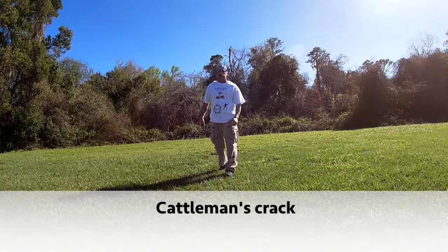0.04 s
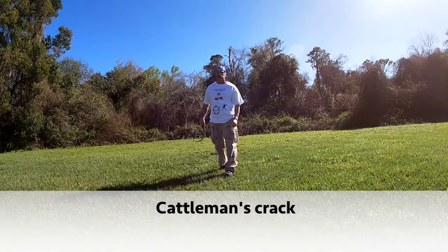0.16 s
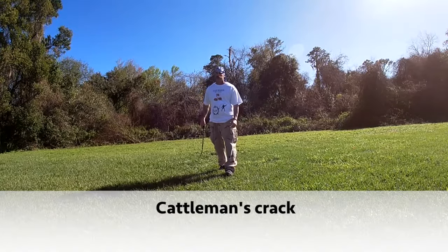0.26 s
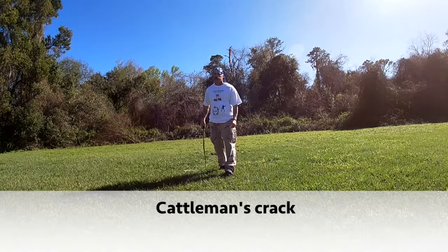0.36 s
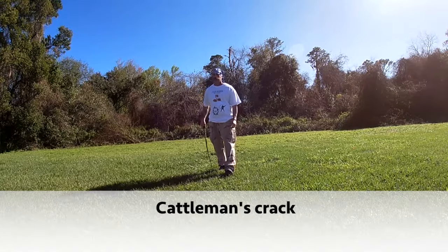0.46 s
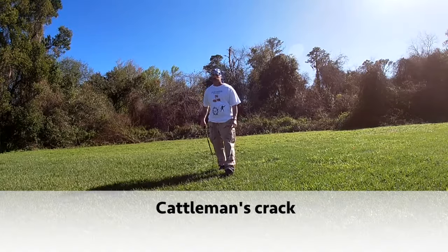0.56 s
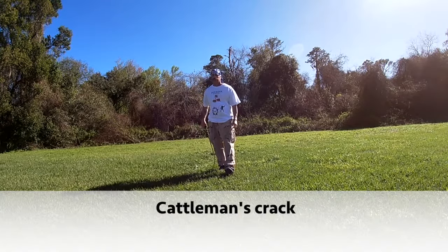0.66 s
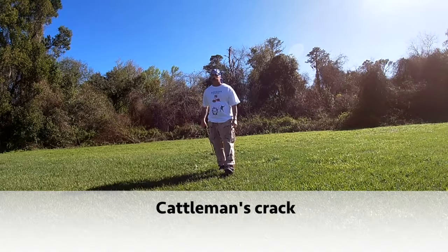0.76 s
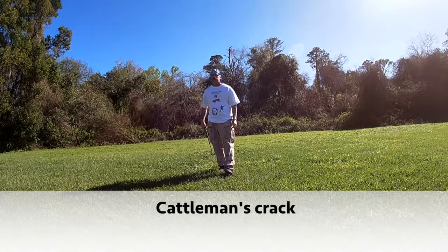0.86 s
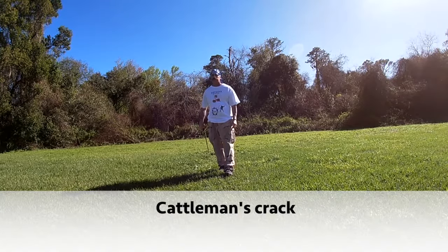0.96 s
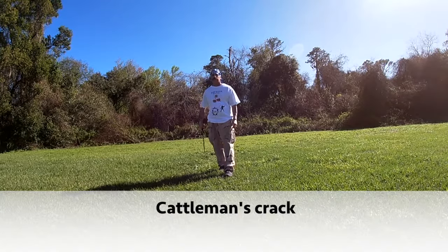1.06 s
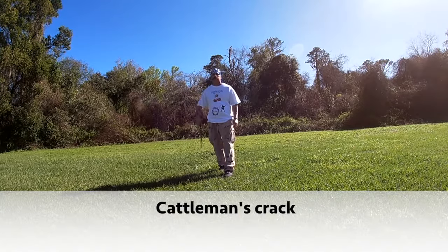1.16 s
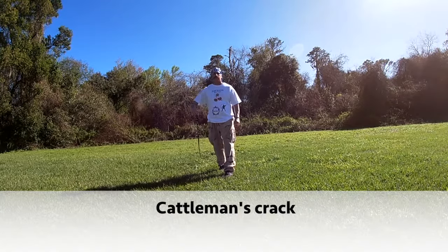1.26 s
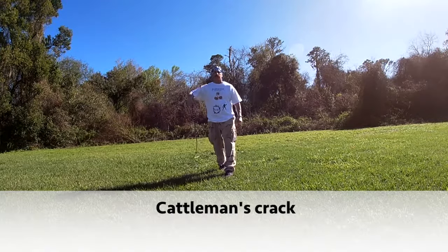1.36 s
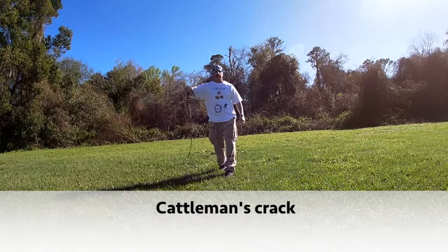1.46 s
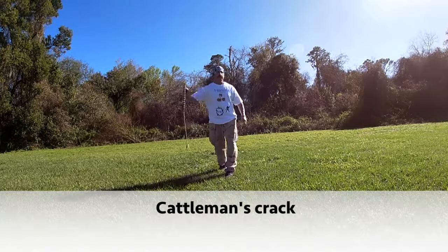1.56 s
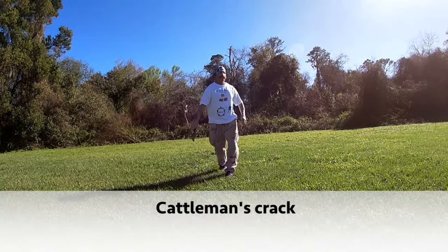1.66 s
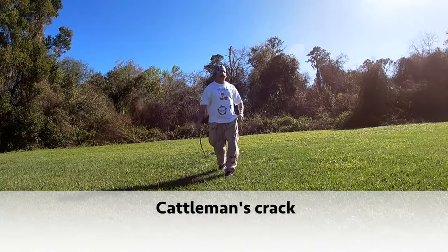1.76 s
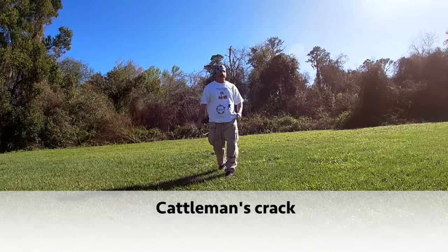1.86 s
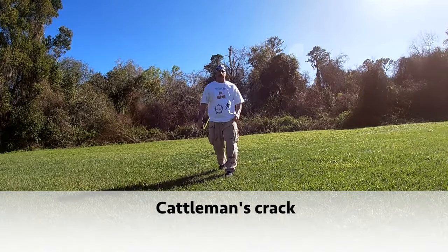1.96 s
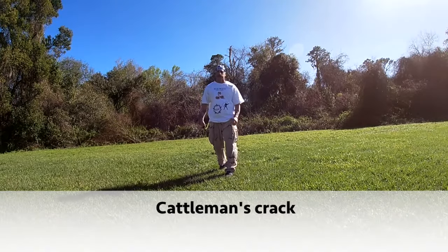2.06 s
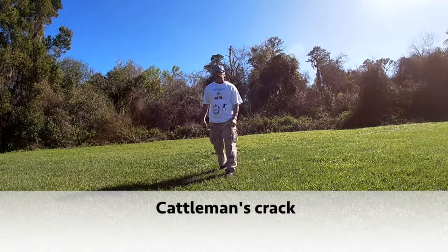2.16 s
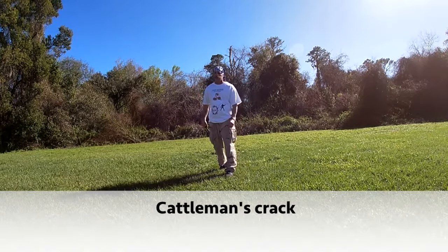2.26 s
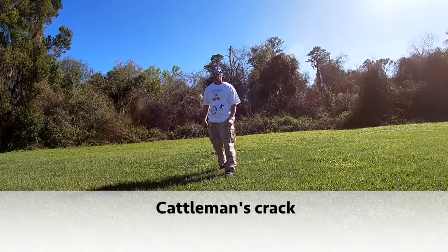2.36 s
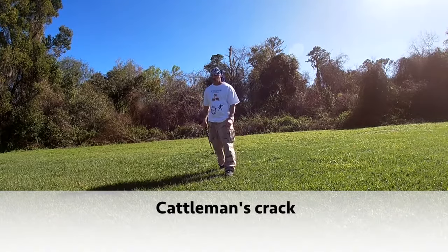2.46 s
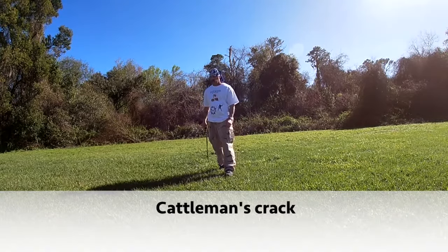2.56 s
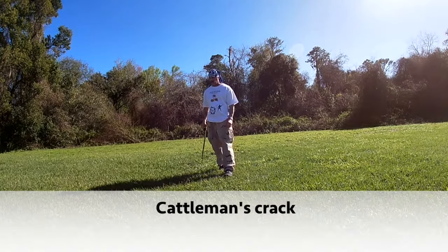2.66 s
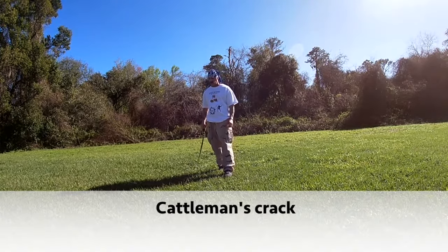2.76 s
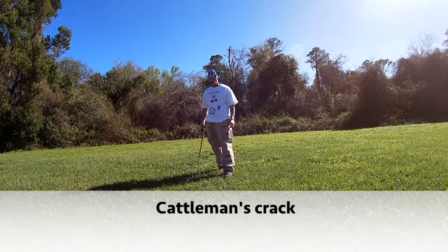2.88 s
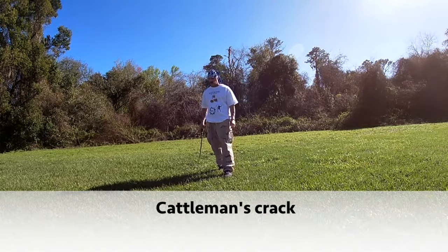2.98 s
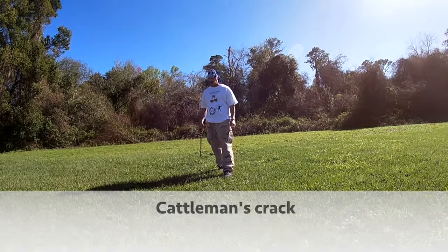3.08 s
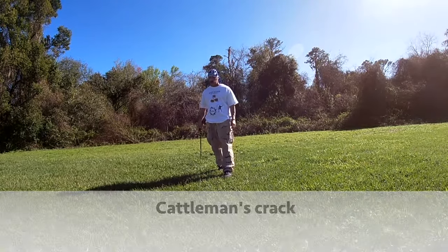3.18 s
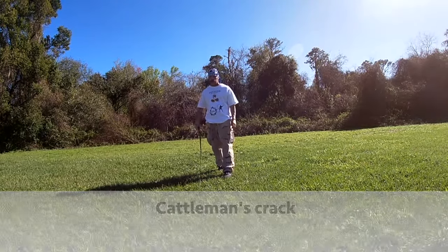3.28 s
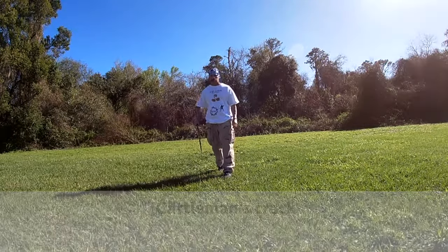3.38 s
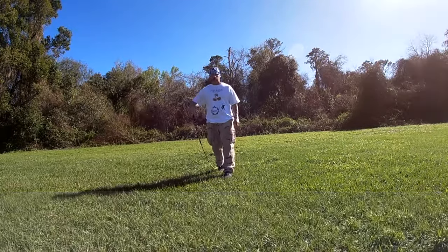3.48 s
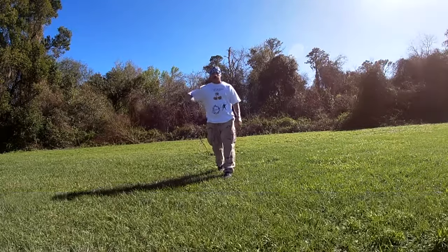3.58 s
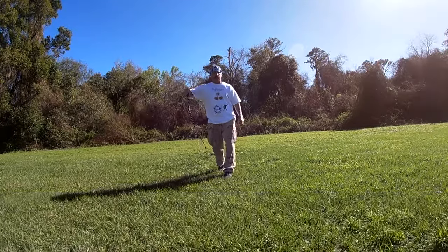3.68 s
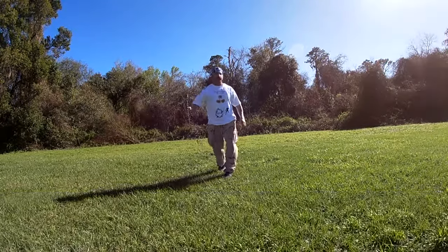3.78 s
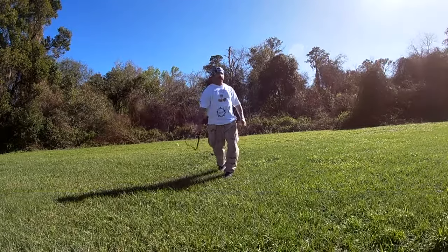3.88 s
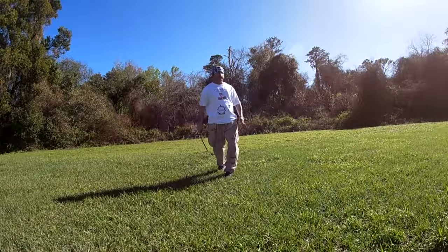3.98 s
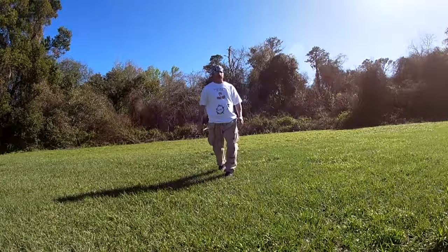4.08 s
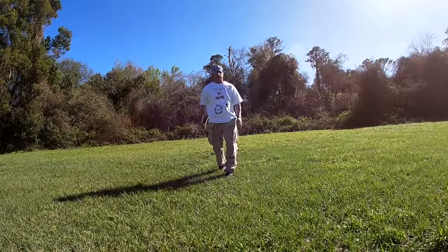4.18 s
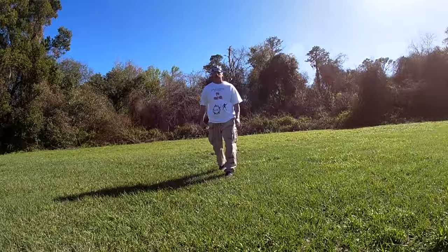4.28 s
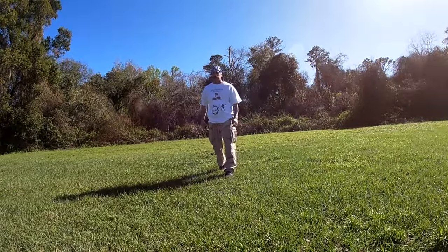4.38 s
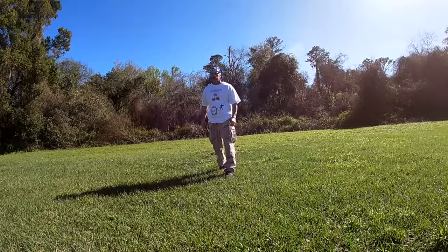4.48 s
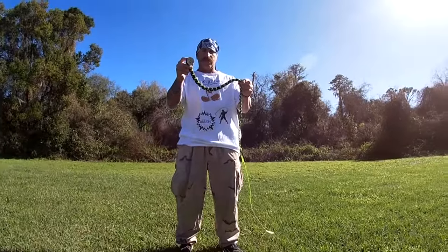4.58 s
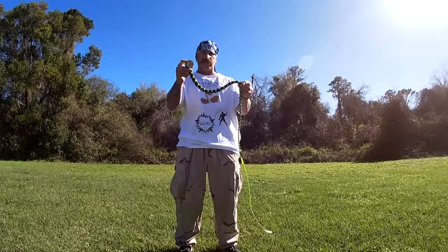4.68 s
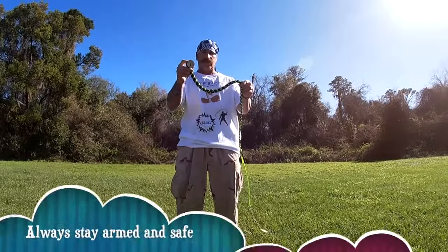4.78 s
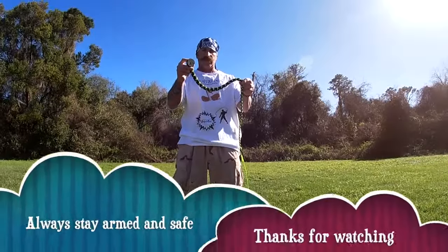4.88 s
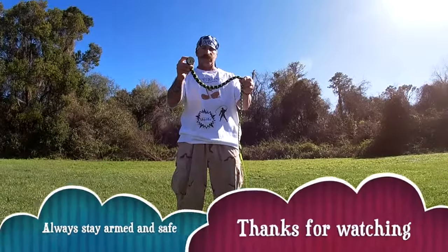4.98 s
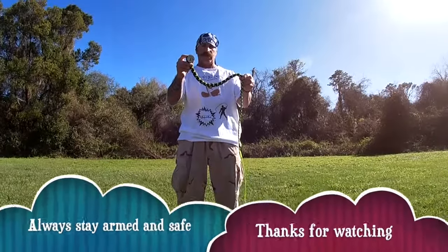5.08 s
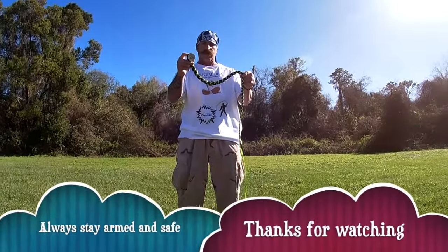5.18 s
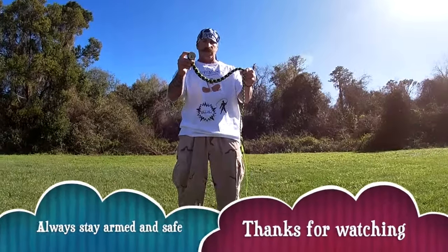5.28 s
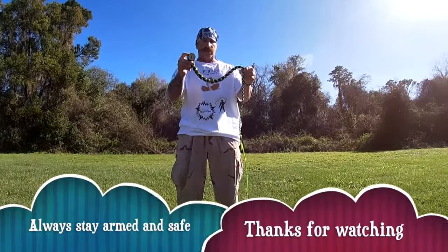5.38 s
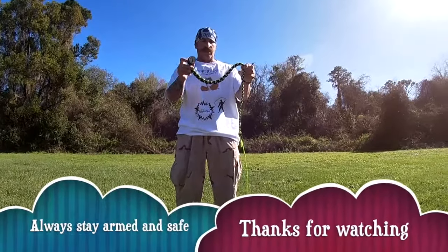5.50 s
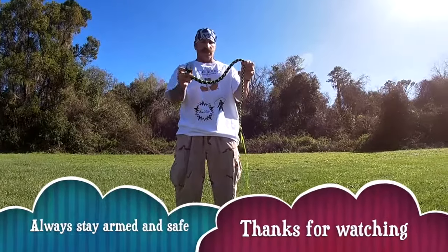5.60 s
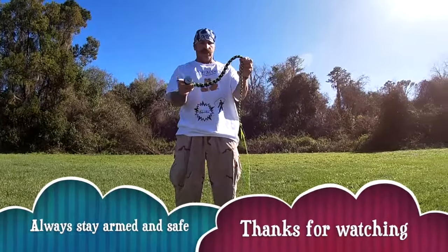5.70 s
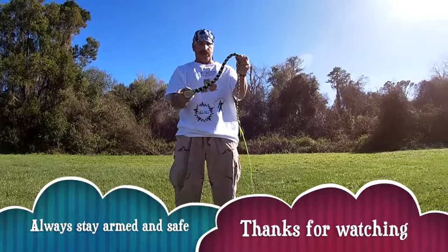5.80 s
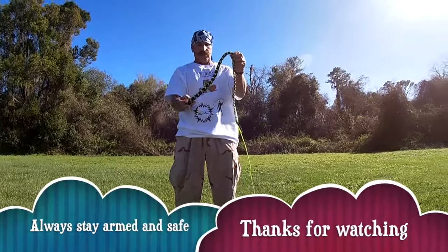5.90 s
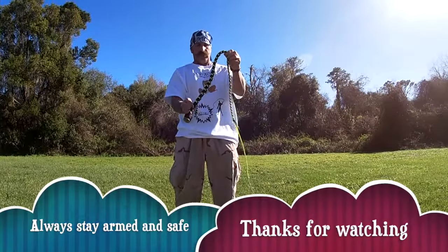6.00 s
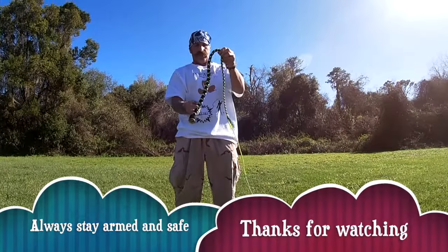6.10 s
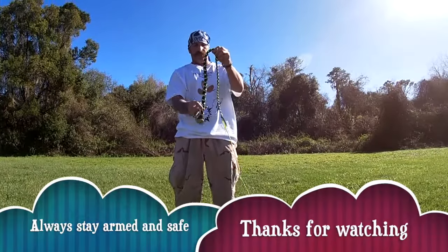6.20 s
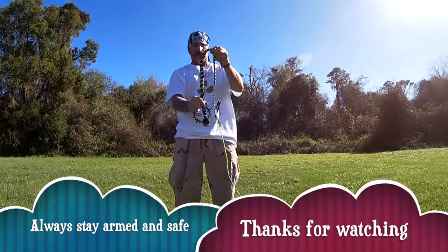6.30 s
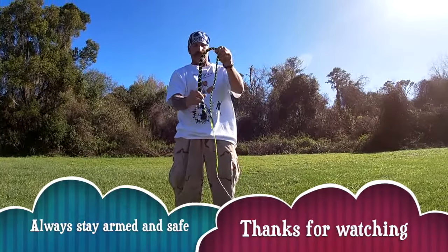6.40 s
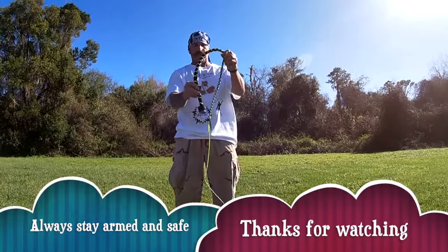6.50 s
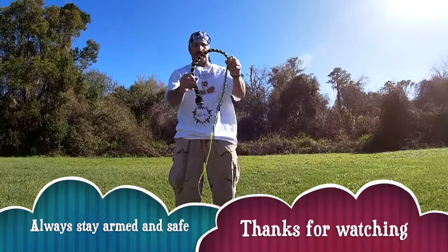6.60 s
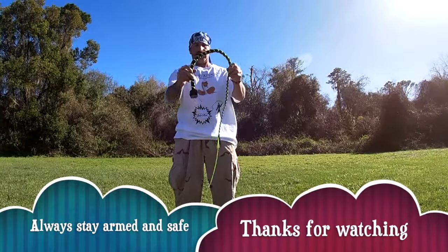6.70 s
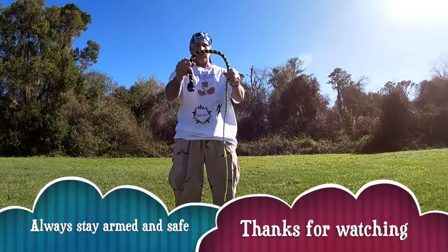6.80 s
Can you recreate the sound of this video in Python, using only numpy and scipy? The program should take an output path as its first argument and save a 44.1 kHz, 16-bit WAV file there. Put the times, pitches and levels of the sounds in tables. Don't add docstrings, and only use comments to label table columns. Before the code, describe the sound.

An open lawn recorded with an exposed outdoor microphone. From 0 to 0.75 s strong wind buffets it with deep, lumpy thumps, hardest around 0.5 and 0.7 s, with a few faint bird chirps. Beneath run a low, steady small-engine throb near idle, distant traffic hiss and thin high insect buzzing; the wind eases after 1 s. At 1.74 s a whip cracks: a tiny rush, then an extremely sharp, clipped, bright snap, with a scattered tree echo a tenth of a second later, fading within half a second. Faint grass brushes and ticks come at 2.5-3.5 s. A second similar crack hits at 3.93 s, with its echo. Lash ticks sound at 4.3-4.4 s. At 4.56 s a hard cut removes the engine: far quieter air remains, with soft low wind, faint leaf hiss, barely audible buzzing, and small wind bumps near 6.6 s until the end at about 6.9 s.

```python
import sys
import numpy as np
from scipy import signal
from scipy.fft import rfft, irfft, next_fast_len
from scipy.io import wavfile
from scipy.ndimage import uniform_filter1d, map_coordinates

SR = 44100
rng = np.random.default_rng(int(sys.argv[2]) if len(sys.argv) > 2 else 0)


def how_loud(loudness_db):
    steps = np.asarray(loudness_db, float) / 20
    return 10 ** steps


def wrap_up_sound(samples):
    columns = np.atleast_2d(samples).T
    tamed = np.clip(columns, -1, 1)
    steps = np.round(tamed * 32767).astype(np.int16)
    wavfile.write(sys.argv[1], SR, steps)


N = 302085
TIME = np.arange(N) / SR
CUT = 4.5572
BEFORE = TIME < CUT

# (time [s], level [dB])
TRAFFIC_LEVEL = [
    [(0, -37), (.3, -40), (1.6, -40.5), (2.45, -39.5), (4.55, -38.5)],
    [(4.6, -55), (5.5, -52.5), (6.85, -52.5)],
]
# (frequency [Hz], density [dB per Hz])
TRAFFIC_COLOUR = [
    [(190, -22.5), (330, 0.5), (377, -6.5), (526, -11), (820, -11), (1360, -12.5), (1920, -16.5),
     (2450, -21.5), (2900, -35.5), (4160, -59.5), (7040, -120)],
    [(180, -6), (300, 0.5), (416, -13.5), (640, -5.5), (880, -1.5), (1070, -3.5), (1840, -12.5),
     (2400, -22.5), (3100, -31.5), (4200, -58), (6160, -120)],
]
# (frequency [Hz], density [dB per Hz])
LEAF_COLOUR = [
    [(1650, -30.5), (2800, 0.5), (5690, -6.5), (7860, -19.5), (9770, -12.5), (10800, -20.5), (12600, -35.5),
     (13300, -55.5), (15000, -56.5)],
    [(1650, -49), (2800, -8.5), (3670, 3), (4800, -2), (5710, 0), (7830, -9), (9930, -9.5), (10800, -16),
     (13000, -26)],
]
# (time [s], level [dB])
WIND_LEVEL = [
    [(0, -13.5), (.19, -18), (.36, -14.5), (.53, -11), (.72, -18), (1.1, -25), (1.4, -24.5), (2.1, -27),
     (2.95, -26.5), (4.2, -32), (4.55, -27)],
    [(4.57, -41), (4.9, -37.5), (5.1, -44.5), (5.57, -39.5), (6.4, -38), (6.6, -37.5), (6.85, -39)],
]
# (frequency [Hz], density [dB per Hz])
WIND_COLOUR = [
    [(8, -29.5), (18, -7), (35, -4.5), (60, -3.5), (100, -8), (170, -8.5), (260, -24.5), (500, -50.5),
     (1100, -120)],
    [(8.8, -36), (15, -4.5), (90, -2), (119, -12), (162, -8), (247, -15.5), (270, -35), (500, -33),
     (650, -65), (1100, -120)],
]
# (time [s], peak [dB], pitch [Hz], direction and strength [factor])
WIND_SLAPS = [(0.306, -1.5, 80, 1), (0.4999, 2, 121, 1), (.377, 0, 60, 0.76), (0.497, -14, 300, -1.3),
              (.514, -3, 135, -1.16), (.519, -1.5, 121, 0.95), (.549, -8.5, 130, 0.76),
              (.709, -26, 475, -1), (5.575, -26, 35.2, 1), (6.574, -34, 450, -1), (.6, -4.5, 45, -1.37),
              (.613, -6, 50, 1), (0.7052, 3, 115, 0.76), (.711, -3, 99, -0.98), (2.966, -8.5, 50, 1),
              (3.932, -8.5, 55.3, 0.85), (4.606, -20, 70, 0.98), (4.706, -26, 109.5, 1),
              (6.573, -25.5, 208, -0.91), (6.582, -21, 109.6, -0.82), (6.615, -15.5, 60, -1),
              (6.69, -23, 69.5, -1.15), (6.708, -25.5, 54.5, -1.3)]
# (time [s], near insect [dB], far insect [dB])
INSECT_LEVEL = [
    [(0, -73, -72), (.4, -69, -83), (1.1, -69.5, -73), (1.6, -63, -72.5), (2.3, -67, -80.5), (3, -64, -76),
     (3.45, -66, -81), (3.85, -64.5, -68.5)],
    [(4.7, -84.5, -94), (5.13, -78, -81), (5.9, -85.5, -87), (6.85, -87, -89.5)],
]
# (rate [per s], start [share of cycle], length [share of cycle], top [Hz], rise [Hz], fall [Hz])
WING_STROKES = [
    (59.6, 0.5, .64, 9700, 750, 2000),
    (71, 0.61, 0.51, 10230, 560, 600),
]
# (time [s], level [dB], brightness [dB per order], unevenness of the two cylinders [dB])
ENGINE_LOAD = [(0, -23, 0.6, -4.5), (.4, -21.5, -0.5, -2.5), (.78, -22, 0, 3.5), (1.1, -22, -0.55, -0.9),
               (1.7, -23.5, -.5, 1), (2.1, -24, 0.9, -3.5), (2.4, -22.5, -.5, 0), (2.9, -23.5, 0, -0.5),
               (3.25, -25, 2.5, 1), (3.6, -29, 0.5, -3.5), (3.9, -25.5, 0.9, 0.8), (4.18, -28, 1.7, 0),
               (4.4, -26.5, 0, 1), (4.55, -28.5, 3, 2)]
# (order, level against the load [dB])
FIRING_ORDERS = [(3, -4), (4, 1.8), (5, 1), (6, -2),
                 (1, -32), (2, -27.5), (7, -11.5), (8, -12.5), (9, -20.5), (10, -22), (11, -27.5), (12, -19),
               (13, -33.5), (14, -39.5), (15, -32.5), (16, -36.5), (18, -34)]
# (time [s], peak
# [dB], centre [Hz], width [Hz])
SHORT_TICKS = [(0.47, -25.5, 5100, 3520), (2.85, -27.5, 3580, 501.2), (2.9851, -29, 4200, 1000),
               (2.9845, -38, 7400, 5000), (3.487, -45, 12000, 3200), (4.277, -25.5, 4200, 1510),
               (4.415, -33, 9000, 4000), (4.4227, -15, 3430, 3060), (4.422, -23.5, 7900, 4970),
               (5.09, -57.5, 9000, 1000), (6.463, -37, 1100, 510), (4.9, -42, 6000, 9000)]
# (time [s], level [dB], centre [Hz], width [Hz], t60
# [s])
RUSTLES = [
    (.402, -37.5, 6750, 6950, 0.11),
    (2.516, -55, 5910, 5930, .15),
    (2.622, -59, 10000, 4030, 0.089),
    (2.662, -54, 10100, 4000, 0.056),
    (2.83, -59, 10040, 4000, .1),
    (3.02, -44, 3000, 1500, 0.094),
    (4.001, -41, 6540, 5000, 0.036),
    (1.748, -33, 9500, 5030, .2),
]
# (time [s], length [s], from [Hz], to [Hz], level [dB])
BIRD_NOTES = [
    (0.606, 0.068, 3300, 3240, -60.5),
    (0.724, .06, 3100, 3050, -54),
    (.79, 0.022, 3170, 3030, -50),
    (6.655, 0.06, 2150, 3300, -68),
    (0.56, .04, 3600, 4300, -60.5),
]
# (crack [s], echo [dB], gain dip [dB], second row [dB], damping [factor])
ECHO_PER_CRACK = [
    (1.737, -23, -1, -7.1, 1.2),
    (3.928, -26.5, 3.5, -5, 1.2),
]
# (delay after crack [s], depth [s], level [dB], rise [s], t60 [s])
TREE_ROWS = [
    (0.066, 0.015, -19, 0.0017, 0.12),
    (0.0948, 0.085, -2.5, 0.001, 0.17),
    (0.203, 0.097, -8.5, 0.0068, .04),
    (0.091, 0.15, -12.5, .003, 0.93),
]
# (delay after crack [s], extra level [dB])
TRUNK_FLASHES = [
    (0.098, 1.5),
    (.123, 2),
    (0.176, 2),
    (.228, -2),
    (.292, 1),
    (.345, 4.5),
]
# (frequency [Hz], density [dB per Hz])
ECHO_COLOUR = [
    [(400, -43), (800, -19.5), (1500, -5), (2300, -3.5), (4000, 0.5), (5600, -4.5), (6900, -17),
     (10000, -9.5), (13800, -27), (15500, -51)],
    [(300, -43), (600, -14), (1200, -5), (2300, -2), (4000, -1.5), (5700, -3.5), (7500, -10.5),
     (10400, -13), (14000, -26), (15500, -47)],
]
# (frequency [Hz], loss [dB per s])
TRAVEL_LOSS = [(1000, -49), (2000, -36), (4000, -9), (5500, 10), (7000, 32.5), (10000, 67), (14000, 82.5)]
# (snap [s], loop turn from snap [s], its level [dB], flick back from snap [s], its level [dB])
WHIP_CRACKS = [
    (1.7388, -.0109, -7.5, .0055, -5),
    (3.9357, -.0105, -3.5, 0.003, 0),
]
# (time from snap [s], level [dB], rise [s], t60 [s], treble [share 0-1])
LASH_BURSTS = [
    (-.035, -37.5, .025, .4, .3),
    (-.003, -10.5, .002, .03, .15),
    (0, 0.5, .0004, .008, .3),
    (.002, 0.2, .0004, .011, .15),
    (.0081, -32.5, .002, .085, .65),
]
# (frequency [Hz], density [dB per Hz])
DULL_COLOUR = [(100, -22), (300, -9.5), (900, -2), (2000, -2), (4000, -2.5), (6000, -11), (9000, -18),
               (16000, -59.5)]
# (frequency [Hz], density [dB per Hz])
BRIGHT_COLOUR = [(3530, -42.5), (6000, -5), (7620, -0.5), (9530, 4.5), (12000, -4.5), (13200, -12),
                 (14400, -13), (15600, -13.5)]
# (time [s], ring [dB], ring [Hz], push [dB])
SHOCK_FRONTS = [
    (1.7398, -1, 9350, -1.5),
    (1.74, -3.5, 11550, -8),
    (1.7418, -4.5, 10300, 2),
    (1.7447, -15.5, 9000, -1),
    (3.9261, -7.5, 9500, -2),
    (3.9357, -3, 9640, -8.5),
    (3.9364, -5.5, 12000, -13),
    (3.938, -7.5, 10300, -2),
]


def unit(x):
    return x / np.sqrt(np.mean(x ** 2) + 1e-20)


def along(points, hz):
    f, v = np.transpose(points)
    return np.interp(np.log(hz + 1), np.log(f + 1), v)


def curves(*tables):
    s, *columns = np.transpose(np.concatenate(tables))
    return [np.interp(TIME, s, column) for column in columns]


def across_cut(*tables):
    return np.where(BEFORE, curves(*tables[:-1]), curves(tables[-1]))


def wobble(rate):
    coarse = TIME[::16]
    knots = rng.standard_normal(int(N * rate / SR) + 4)
    return np.interp(TIME, coarse, map_coordinates(knots, [coarse * rate]))


def noise(gain, size=N):
    m = next_fast_len(size)
    spectrum = rfft(rng.standard_normal(m)) * gain(np.fft.rfftfreq(m, 1 / SR))
    return unit(irfft(spectrum, m)[:size])


def coloured(spectrum, size=N):
    return noise(lambda hz: how_loud(along(spectrum, hz)), size)


def add(track, s, sound):
    part = track[round(s * SR):][:len(sound)]
    part += sound[:len(part)]


def traffic_and_leaves():
    road_db, = across_cut(*TRAFFIC_LEVEL)
    usual_db = np.where(BEFORE, road_db[BEFORE].mean(), road_db[~BEFORE].mean())
    leaf_db = usual_db + 1.8 * (road_db - usual_db) + np.where(BEFORE, -15, -14)
    road = np.where(BEFORE, coloured(TRAFFIC_COLOUR[0]), coloured(TRAFFIC_COLOUR[1]))
    leaves = np.where(BEFORE, coloured(LEAF_COLOUR[0]), coloured(LEAF_COLOUR[1]))
    road = how_loud(road_db + 1.0 + 0.39 * wobble(3.4)) * road
    return road + how_loud(leaf_db - 1.5 + 1.1 * wobble(13)) * leaves


def wind():
    gusts = np.where(BEFORE, coloured(WIND_COLOUR[0]), coloured(WIND_COLOUR[1]))
    lumps_db = 1.4 * wobble(13) + 1.2 * wobble(5)
    out = how_loud(across_cut(*WIND_LEVEL)[0] + 1.78 + lumps_db) * gusts
    t = np.arange(-SR // 25, SR // 25) / SR
    for s, db, hz, direction in WIND_SLAPS:
        slap = np.cos(2 * np.pi * hz * t) * np.exp(-(2.6 * hz * t) ** 2)
        add(out, s + t[0], direction * how_loud(db) * slap)
    return out


def insects():
    out = 0
    for db, (rate, start, length, top_hz, rise_hz, fall_hz) in zip(across_cut(*INSECT_LEVEL), WING_STROKES):
        cycle = (rate * TIME + start + 0.017 * wobble(5)) % 1
        u = np.minimum(cycle / length, 1)
        rising = rise_hz * (1 - u / .45) ** 2
        falling = fall_hz * ((u - .45) / .55) ** 2
        hz = top_hz - np.where(u < .45, rising, falling) + 40 * wobble(300)
        stroke = np.sin(np.pi * u) ** .7 * (1.2 - .7 * u) * how_loud(1.2 * wobble(120))
        out = out + how_loud(db + 1.0) * unit(stroke * np.sin(2 * np.pi * np.cumsum(hz) / SR))
    return out


def engine():
    idle_hz, surplus_hz, settle_s = 24.93, .6, 1.25
    level_db, bright_db, odd_db = curves(ENGINE_LOAD)
    rate_hz = idle_hz + surplus_hz * np.exp(-TIME / settle_s)
    turn = 2 * np.pi * (np.cumsum(rate_hz) / SR + 0.037)
    out = np.zeros(N)
    for k, order_db in FIRING_ORDERS:
        db = level_db + order_db + bright_db * min(k - 4, 2)
        db = db + k % 2 * odd_db
        db = db + 1.6 * wobble(4.1) + 0.88 * wobble(14)
        lag = .35 * (k - 4) ** 2 + 0.088 * k * wobble(6)
        out += np.sqrt(2) * how_loud(db) * np.cos(k * turn + lag)
    return BEFORE * out


def small_sounds():
    out, t = np.zeros(N), np.arange(SR // 5) / SR
    for s, db, hz, width_hz in SHORT_TICKS:
        swell = (4.2 * width_hz * t) ** 2 * np.exp(-4.5 * width_hz * t)
        add(out, s, how_loud(db + 6) * swell * np.sin(2 * np.pi * hz * t))
    for s, db, hz, width_hz, t60 in RUSTLES:
        band = noise(lambda f: np.exp(-((f - hz) / width_hz * 0.9) ** 2) * (f > 1800) * (f < 13500), len(t))
        add(out, s, how_loud(db - 60 * t / t60) * (1 - np.exp(-t / 0.002)) * band)
    for s, length, from_hz, to_hz, db in BIRD_NOTES:
        u = np.minimum(t / length, 1)
        glide_hz = from_hz + (to_hz - from_hz) * u
        add(out, s, how_loud(db) * np.sin(np.pi * u) * np.sin(2 * np.pi * np.cumsum(glide_hz) / SR))
    return signal.sosfilt(signal.butter(8, 13300, fs=SR, output="sos"), out)


def ducking():
    total_db = np.zeros(N)
    for s, _, dip_db, *_ in ECHO_PER_CRACK:
        t = np.maximum(TIME - s, 0)
        total_db += dip_db * (1 - np.exp(-t / 0.011)) * np.exp(-t / .15)
    return how_loud(-total_db)


def trees():
    patchy_db, top_hz, flash_s = 2, 14630, 0.0057
    out = np.zeros(N)
    for (s, db, _, second_db, damp), colour in zip(ECHO_PER_CRACK, ECHO_COLOUR):
        hz, t, z = signal.stft(coloured(colour, int(.75 * SR)), SR, nperseg=256)
        clumps = uniform_filter1d(rng.standard_normal(z.shape), size=7, axis=0)
        clumps = unit(uniform_filter1d(clumps, size=5, axis=1))
        travel_s = np.clip(t - .15, -.06, 0.099 + .3 * t)
        loss_db = damp * along(TRAVEL_LOSS, hz)[:, None] * travel_s
        z = z * how_loud(patchy_db * clumps - loss_db) * (hz < top_hz)[:, None]
        dull = signal.istft(z, SR, nperseg=256)[1]
        t = np.arange(len(dull)) / SR
        rows = []
        for delay, depth, row_db, rise, t60 in TREE_ROWS:
            decay_db = 60 * np.maximum(t - delay - depth, 0) / t60
            rows.append(how_loud(row_db - decay_db) / (1 + np.exp((delay - t) / rise)))
        rows[2] *= how_loud(second_db)
        flash_db = sum(trunk_db * np.exp(-((t - delay) / flash_s) ** 2) for delay, trunk_db in TRUNK_FLASHES)
        level = how_loud(db + flash_db + 1.3 * wobble(130)[:len(t)])
        add(out, s, level * np.linalg.norm(rows, axis=0) * dull)
    return BEFORE * out


def whip():
    out, t = np.zeros(N), np.arange(SR // 8) / SR
    for snap, turn_s, turn_db, flick_s, flick_db in WHIP_CRACKS:
        loop_turn = (turn_s, turn_db, .0011, 0.02, .1)
        flick_back = (flick_s, flick_db, .0006, 0.014, .12)
        for s, db, rise, t60, treble in LASH_BURSTS + [loop_turn, flick_back]:
            dull = np.sqrt(1 - treble) * coloured(DULL_COLOUR, len(t))
            bright = np.sqrt(treble) * coloured(BRIGHT_COLOUR, len(t))
            add(out, snap + s, how_loud(db - 60 * t / t60) * (1 - np.exp(-t / rise)) * (dull + bright))
    return out


def shocks():
    out, t = np.zeros(N), np.arange(SR // 100) / SR
    for s, ring_db, ring_hz, push_db in SHOCK_FRONTS:
        push = (1 - t / 0.00048) * np.exp(-t / .00018)
        ring = np.sin(2 * np.pi * ring_hz * t) * np.sin(np.pi * np.minimum(t / .0008, 1))
        add(out, s, how_loud(push_db) * push + how_loud(ring_db) * ring)
    return out


def scene():
    around = traffic_and_leaves() + wind() + insects() + engine() + small_sounds()
    ending = np.where(BEFORE, np.clip((CUT - TIME) / .006 + .2, 0, 1), 1)
    return (ending * ducking() * around + trees() + whip() + shocks())[None]


def low_pass(x):
    return signal.sosfilt(signal.butter(12, 15710, fs=SR, output="sos"), x)


def record(dry):
    fade = np.minimum((TIME[-1] - TIME) / .004, 1)
    return low_pass(np.clip(dry, -1, 1) * fade)


dry = scene()
out = record(dry)
wrap_up_sound(out)
```